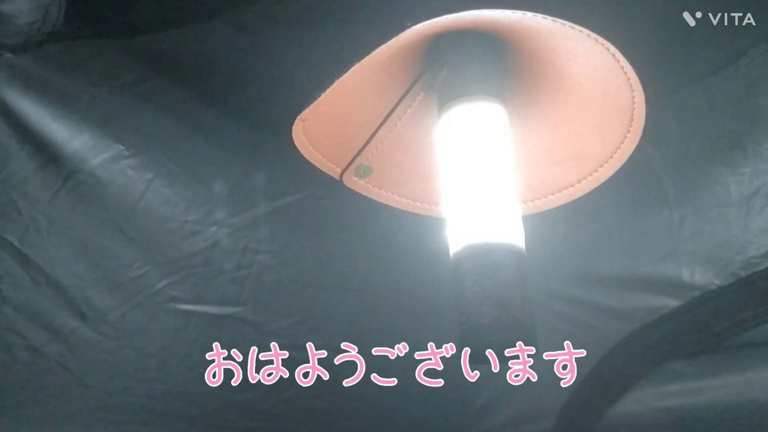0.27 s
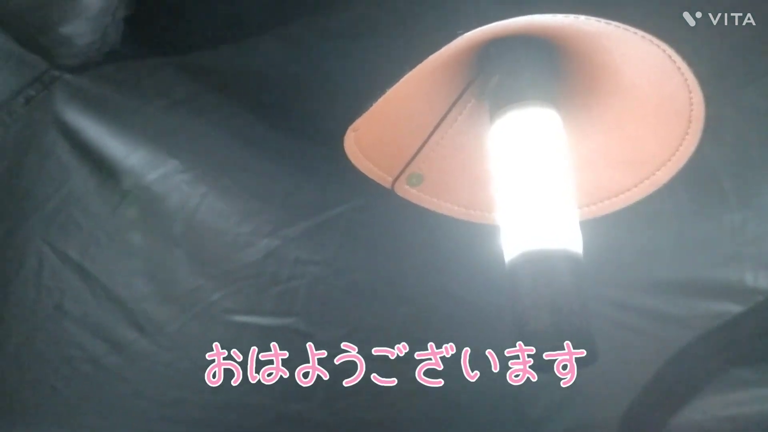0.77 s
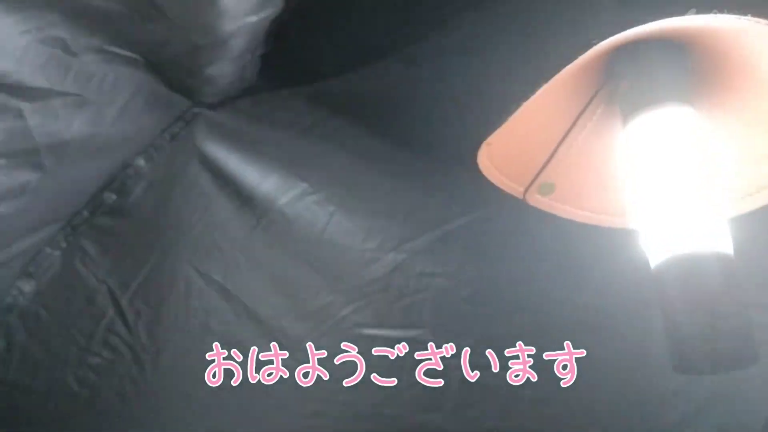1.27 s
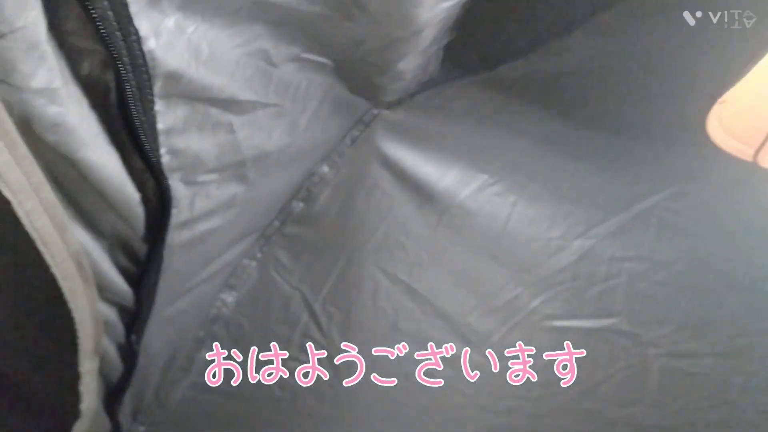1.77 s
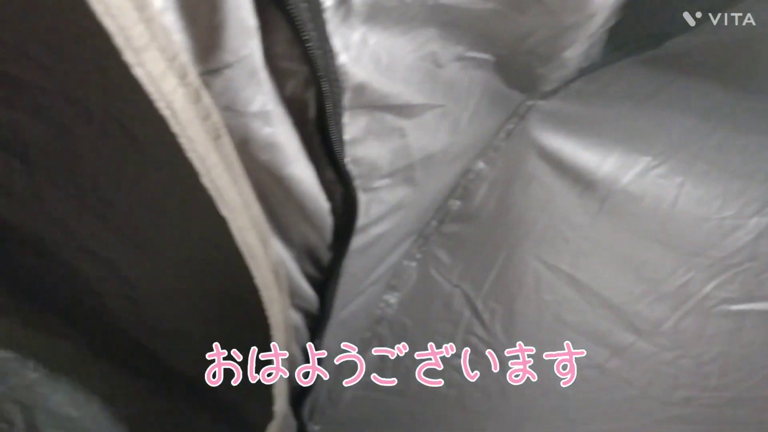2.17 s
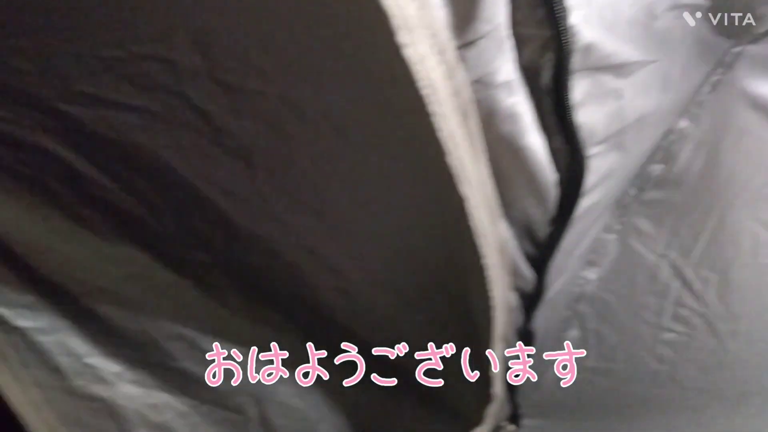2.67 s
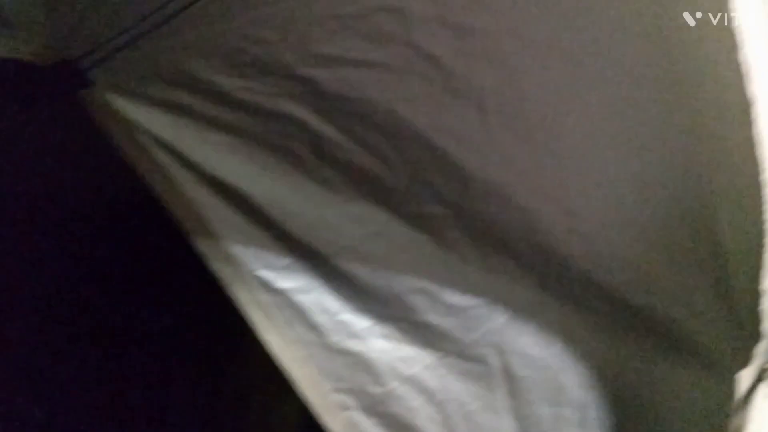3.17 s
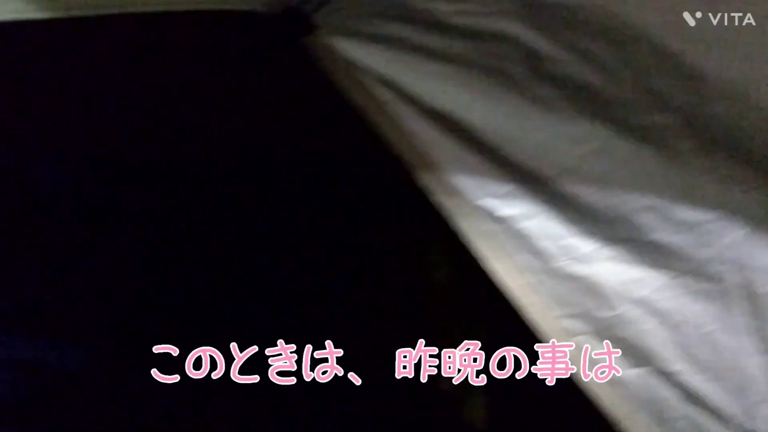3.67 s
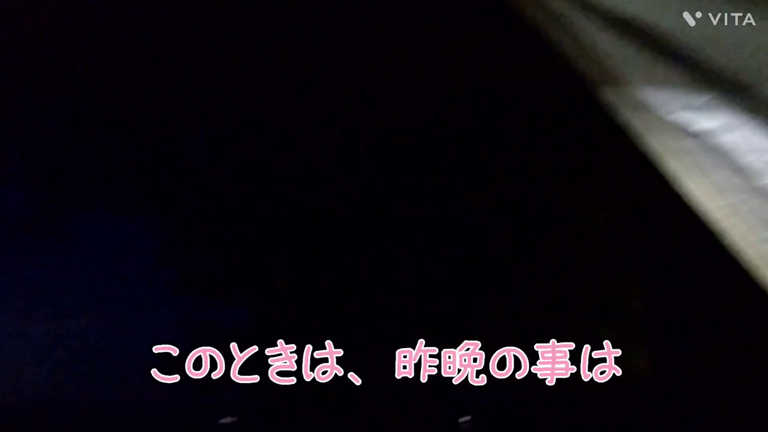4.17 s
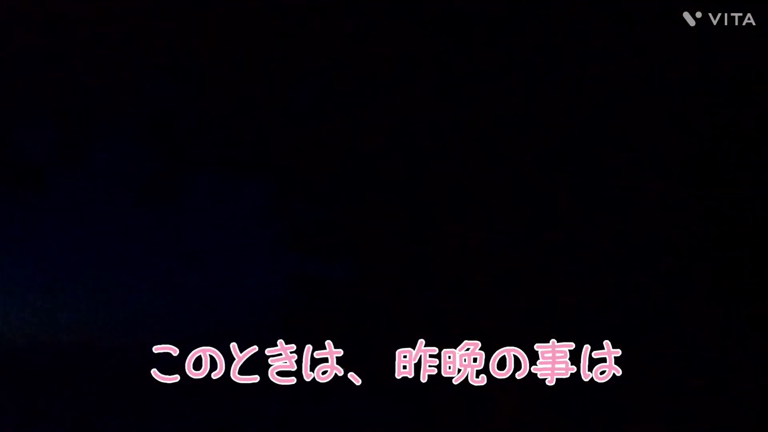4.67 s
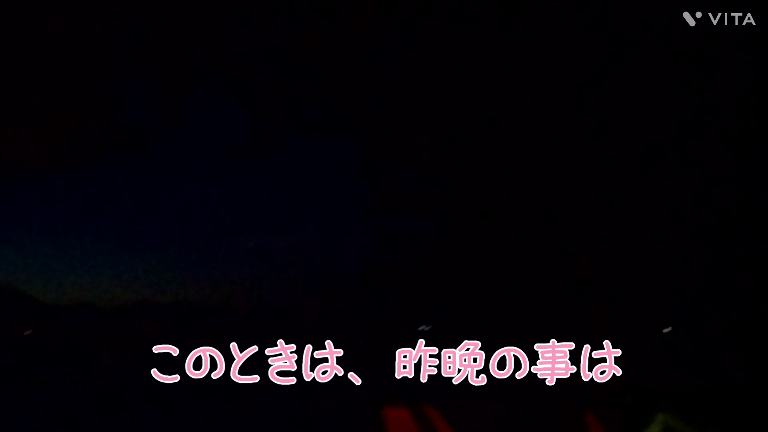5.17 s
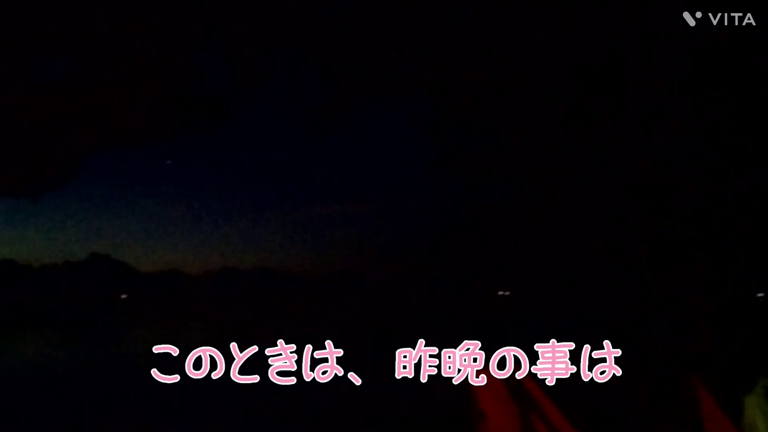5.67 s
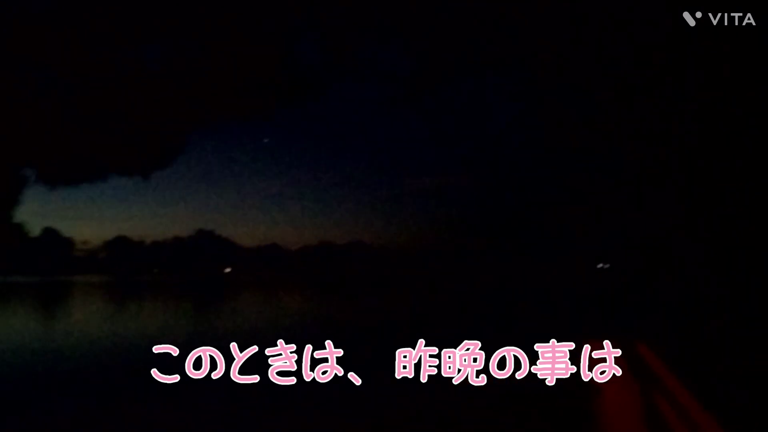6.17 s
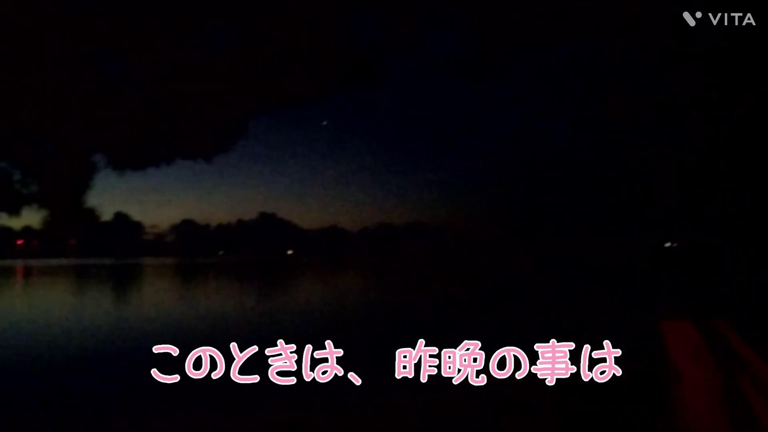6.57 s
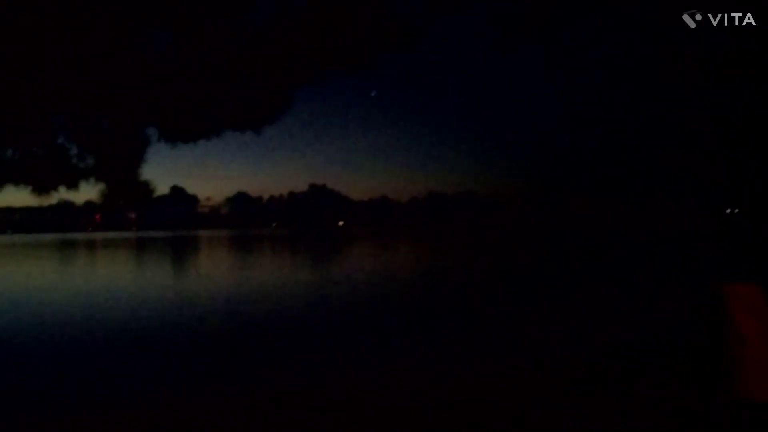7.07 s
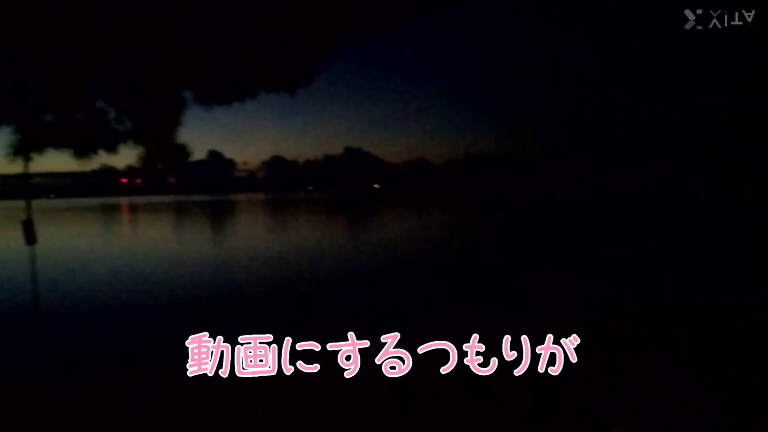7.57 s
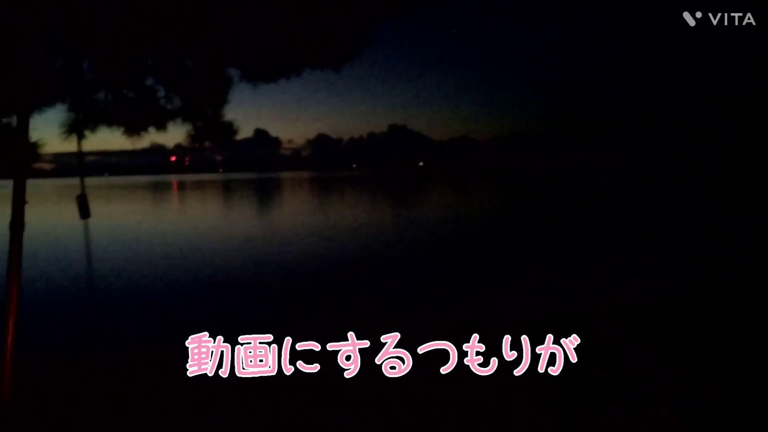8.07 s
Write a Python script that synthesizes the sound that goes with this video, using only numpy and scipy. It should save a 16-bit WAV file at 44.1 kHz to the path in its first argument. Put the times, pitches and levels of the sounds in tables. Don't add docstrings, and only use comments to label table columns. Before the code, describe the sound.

A quiet lakeside before dawn, heard through a phone microphone. From 0 to about 1 second near crickets trill strongly around 3.9 kHz, each pulse a tiny falling whistle, fourteen to twenty-one per second; hiss and low rumble are raised until 0.76 seconds, then drop. Small drips and a brief lap come at 0.3 to 0.65, a cloth snap at 0.6. From 1 to 5 seconds softer trill phrases overlap, with high buzzes, dry rasps and a blurred distant chorus. Faint ticks at 2.0, 3.4 and 3.7; dull low finger knocks at 3.8 and 4.6. Trilling strengthens around 5.5 to 6.5. Fine bubbles lap from 6 to 7.2, with snaps at 6.55 and, sharpest, 7.1. Near crickets then rest, leaving a faint higher trill; hiss lifts at 7.7, and soft near trills return at 8.

```python
import sys
import numpy as np
from scipy import signal
from scipy.fft import rfft, irfft, dct
from scipy.io import wavfile
from scipy.ndimage import uniform_filter1d

SR = 44100
rng = np.random.default_rng(int(sys.argv[2]) if len(sys.argv) > 2 else 0)


def rack_gain(trim_db):
    fader = np.asarray(trim_db, float)
    return 10 ** (fader / 20)


def pcm_store(signal):
    levels = np.round(np.clip(np.atleast_2d(signal), -1, 1) * 32767)
    wavfile.write(sys.argv[1], SR, levels.astype(np.int16).T)


N = 366912
FALL_HZ_PER_MS = 19.13


def evened(x):
    return x / np.sqrt(np.mean(x ** 2) + 1e-20)


def curve(rows):
    times, levels = np.transpose(rows)
    return np.interp(np.arange(N) / SR, times, levels)


def add(mix, s, sound):
    start = round(s * SR) - len(sound) // 2
    sound = sound[max(-start, 0):]
    part = mix[max(start, 0):][:len(sound)]
    part += sound[:len(part)]


def noise(spectrum, patchy_db, swell_db):
    frames, hz = N // 256 + 5, np.fft.rfftfreq(1024, 1 / SR)
    a, b, patches = rng.standard_normal((frames, 513, 3)).T
    patches = uniform_filter1d(patches, size=12, axis=0)
    patches = evened(uniform_filter1d(patches, size=10, axis=1))
    swell = evened(uniform_filter1d(rng.standard_normal(frames), size=6))
    f, db = np.transpose(spectrum)
    shape_db = np.interp(np.log(hz + 1), np.log(f + 1), db)
    level_db = shape_db[:, None] + patchy_db * patches + swell_db * swell
    z = (a + 1j * b) * rack_gain(level_db)
    return evened(signal.istft(z, nperseg=1024, noverlap=768)[1][:N])


def glide(db, hz, ms, fall_hz, phase, bend=0.68):
    u = np.linspace(-.5, .5, max(round(ms * SR / 1000), 8))
    pitch_hz = hz - fall_hz * (u + bend * u ** 2)
    turns = np.cumsum(pitch_hz) / SR + phase
    return rack_gain(db) * np.cos(np.pi * u) * np.cos(2 * np.pi * turns)


def echoes(x, t60):
    taps, step = np.zeros(SR // 2), 22
    at = np.arange(200, len(taps) - step, step)
    taps[at + rng.integers(0, step, len(at))] = rng.choice([-1., 1.], len(at))
    taps *= rack_gain(-60 * np.arange(len(taps)) / SR / t60)
    return signal.fftconvolve(x, taps / np.linalg.norm(taps))[:N]


def air():
    # (frequency [Hz], level [dB per Hz])
    wash_spectrum = [(150, -2.5), (300, -8.5), (700, -6.5), (1500, -11), (2500, -15), (4000, -20.5),
                     (8000, -79)]
    hiss_spectrum = [(500, -23), (2000, 2), (3300, -2.5), (4800, 3), (5600, -0.5), (7000, 2), (9000, -1.5),
                     (13000, 0.5), (16000, -4.5)]
    rumble_spectrum = [(4.7, -21), (8.0, 0), (22, -2), (43, 3.5), (65, -12.5), (92, -1.5), (382, -19),
                       (501, -22.5), (600, -27.5), (780, -42), (1320, -120)]
    # (time [s], level [dB])
    wave_swell = [
        (0, 0),
        (1.7, -.5),
        (2.3, 2),
        (3.2, 0.2),
        (4.3, 2.5),
        (5.5, .5),
        (7.2, 1),
        (8.4, 0.5),
    ]
    t = np.arange(N) / SR
    wave_db = curve(wave_swell)
    warm_db = 4.5 / (1 + np.exp((t - 0.76) / 0.065))
    brush_db = 4 * np.exp(-((t - 7.7) / 0.15) ** 2)
    hiss = rack_gain(-70.5 + 0.32 * wave_db + brush_db) * noise(hiss_spectrum, patchy_db=1.76, swell_db=0.36)
    rumble = rack_gain(-59.5 + 0.3 * wave_db) * noise(rumble_spectrum, patchy_db=.5, swell_db=0.64)
    wash = rack_gain(-70 + wave_db) * noise(wash_spectrum, patchy_db=1.5, swell_db=0.93)
    return rack_gain(warm_db) * (hiss + rumble + wash)


def chorus():
    # (time [s], level [dB])
    chorus_level = [
        (0, -66),
        (.9, -75),
        (2.6, -70.5),
        (5.3, -71.5),
        (6.9, -78),
        (8.4, -77),
    ]
    out = np.zeros(N)
    for pace, pitch, start, size in rng.random((9, 4)):
        gap_s = 1 / (13.5 + 9 * pace)
        stroke = glide(-6 * size, 3670 + 350 * pitch, 32, 632, start)
        train = np.zeros(N)
        at = np.arange(start * gap_s, N / SR - .01, gap_s)
        late_s = .004 * rng.random(len(at))
        train[((at + late_s) * SR).astype(int)] = rack_gain(2.8 * rng.standard_normal(len(at)))
        out += signal.oaconvolve(train, stroke)[:N]
    return rack_gain(curve(chorus_level)) * evened(out + rack_gain(-2.5) * echoes(out, t60=0.33))


def far_trill():
    out = np.zeros(N)
    for s in np.arange(6.94, 8.03, .0662):
        later = s > 7.63
        add(out, s, glide(-68 - 4 * later, 4150 - 150 * later, 34, 520, rng.random()))
    return .8 * out + .9 * echoes(out, t60=.08)


def fabric():
    # (time [s], peak [dB], ring [Hz])
    cloth_snaps = [
        (0.6095, -52, 7480),
        (1.9994, -61, 7700),
        (3.421, -54, 8700),
        (3.7035, -55, 7530),
        (6.5583, -54, 7240),
        (7.0996, -46.5, 8100),
    ]
    out, t = np.zeros(N), np.arange(400) / SR
    for (s, db, hz), spit in zip(cloth_snaps, rng.standard_normal((len(cloth_snaps), 400))):
        fade = rack_gain(db + 1.5 - 60 * t / .005)
        ring = np.sin(2 * np.pi * hz * t)
        add(out, s + t[200], fade * (.6 * spit + .7 * ring))
    return out


def knocks():
    # (time [s], peak [dB], ring [Hz])
    finger_knocks = [
        (3.8148, -42, 125),
        (4.6405, -43, 115),
    ]
    out, t = np.zeros(N), np.arange(1400) / SR
    for s, db, hz in finger_knocks:
        turns = hz * t + .25 * (1 - np.exp(-t / .002))
        add(out, s + t[700], -rack_gain(db - 60 * t / .045) * np.sin(2 * np.pi * turns))
    return out


def water():
    # (middle [s], peak [dB], pitch [Hz])
    clear_drips = [(.055, -64, 2497), (.335, -63, 1765), (.377, -64, 535), (.433, -63.5, 1119),
                   (.451, -61, 1610), (.499, -61, 1690), (.503, -60, 1205), (.537, -62.5, 526),
                   (.557, -65, 547), (1.545, -67.5, 910), (2.045, -66, 2110), (2.522, -64, 2330),
                   (3.369, -69, 850), (4.194, -68, 1630), (4.21, -65, 834), (4.831, -68, 1981),
                   (5.885, -61, 1790), (6.063, -65, 1640), (6.265, -66, 825), (6.266, -66, 2368),
                   (6.281, -69, 1162), (6.323, -65, 2300), (6.346, -71, 1310), (6.393, -68, 1722),
                   (6.558, -65, 2756), (6.648, -66, 2411), (6.696, -67, 2130), (6.964, -64, 1450),
                   (7.102, -63.5, 2411), (7.124, -68.5, 1254)]
    # (middle [s], peak [dB], pitch [Hz], length [ms], rise [Hz])
    long_bubbles = [
        (6.274, -70, 1034, 34, 594),
        (7.119, -66, 994, 36, 800),
    ]
    # (start [s], end [s])
    lapping = [
        (.3, .65),
        (6.0, 7.2),
    ]
    out = np.zeros(N)
    for (s, db, hz), phase in zip(clear_drips, rng.random(len(clear_drips))):
        add(out, s, glide(db + 4.5, hz, 11500 / hz, -.25 * hz, phase))
    for at, size, pitch in rng.random((20, 3)):
        hz = 800 * 3.5 ** pitch
        add(out, at * N / SR, glide(-70.5 + 4 * size, hz, 11500 / hz, -.25 * hz, at))
    for s, db, hz, ms, rise_hz in long_bubbles:
        add(out, s, glide(db, hz, ms, -rise_hz, 0))
    for start, end in lapping:
        for at, size, pitch in rng.random((30, 3)):
            hz = 500 * 5.5 ** pitch
            db = -70 + 7 * size - 5 * pitch
            add(out, start + at * (end - start), glide(db, hz, 7000 / hz, -.3 * hz, at))
    return out + rack_gain(-14) * echoes(out, t60=.12)


def ticker():
    # (time [s], peak [dB], pitch [Hz])
    clear_buzzes = [(0.0857, -71, 6520), (0.2473, -72, 6530), (0.4628, -68, 6500), (1.9924, -68, 6490),
                    (2.378, -73, 6470), (2.7641, -71, 6420), (4.345, -73, 6450), (3.5493, -67, 6480),
                    (3.9549, -70, 6970), (4.2058, -72, 6440), (4.6129, -74, 6440), (4.7341, -72, 6470),
                    (5.1417, -71, 6470), (5.4954, -67.5, 6930), (6.0711, -77.5, 6610), (6.5395, -73, 6750)]
    out = np.zeros(N)
    faint = [(s * N / SR, -77 + 5 * size, 6300 + 700 * pitch ** 2)
             for s, size, pitch in rng.random((45, 3))]
    for s, db, hz in list(clear_buzzes) + faint:
        buzz = glide(db + 3.5, hz, 22, 130, 0)
        flutter = 0.7 + 0.28 * np.cos(2 * np.pi * 210 * np.arange(len(buzz)) / SR)
        add(out, s + 0.013, buzz * flutter)
    return out


def rasps():
    # (time [s], peak [dB])
    raspy_strokes = [(0.0727, -61), (0.2129, -65), (0.2887, -59), (0.61, -71), (1.9979, -59),
                     (2.2159, -60.5), (2.3486, -63), (2.4299, -64), (2.5062, -63), (3.4755, -60),
                     (3.704, -61), (5.1352, -64), (5.6012, -64), (6.0112, -73), (6.557, -61), (6.6448, -65),
                     (6.7131, -68), (7.099, -64)]
    teeth, t = np.zeros(N), np.arange(200) / SR
    for (s, db), grit in zip(raspy_strokes, rng.standard_normal((len(raspy_strokes), 900))):
        add(teeth, s + 0.0074, rack_gain(db - 11.5) * grit * np.hanning(len(grit)))
    for at, size in rng.random((200, 2)):
        grit = rng.standard_normal(1300) * np.hanning(1300)
        add(teeth, 1.85 + 6.1 * at, rack_gain(-80.5 + 3.2 * size) * grit)
    ring = t * rack_gain(-60 * t / .003) * np.sin(2 * np.pi * 7650 * t)
    return signal.oaconvolve(teeth, ring / np.linalg.norm(ring))[:N]


def strokes(phrases, gap_s, first_db, lag_s):
    uneven_db, uneven_hz = .8, 20
    rows = []
    for first, last, open_db, close_db, hz in phrases:
        u = np.linspace(0, 1, round((last - first) / gap_s) + 1)
        a, b = rng.standard_normal((len(u), 2)).T
        level_db = open_db + (close_db - open_db) * u + first_db * (u == 0) + uneven_db * a
        at = first + (last - first) * u + lag_s * np.sin(np.pi * u)
        at = at - uneven_hz * b / FALL_HZ_PER_MS / 1000
        rows += zip(at, level_db, hz + uneven_hz * b)
    return rows


def wing(x):
    hz = np.fft.rfftfreq(N, 1 / SR)
    lift_db = 2 * (np.exp(-((hz - 4034) / 122) ** 2) - .5)
    return irfft(rfft(x) * rack_gain(lift_db), N)


def crickets():
    # (first stroke [s], last stroke [s], opening level [dB], closing level [dB], pitch [Hz])
    slow_phrases = [(-.073, .361, -46, -46.5, 3930), (1.083, 1.494, -57, -57.5, 4110),
                    (1.648, 2.571, -61, -55, 3780), (1.719, 2.151, -55, -53, 3970),
                    (2.678, 2.885, -58, -64, 3770), (3.052, 3.256, -64.5, -64, 3780),
                    (3.353, 3.78, -65, -59, 3700), (3.776, 3.997, -57, -57, 3734),
                    (3.85, 4.223, -53.5, -55, 3960), (4.845, 5.052, -62, -71, 3760),
                    (5.173, 5.741, -66, -62.5, 3900), (5.562, 6.08, -55.5, -51, 3906),
                    (6.673, 6.888, -60, -72, 3860), (8.02, 8.31, -58, -57.5, 4030),
                    (8.034, 8.257, -65, -62, 3860), (1.5, 1.571, -66, -62, 4080),
                    (5.176, 5.247, -62, -62, 3860)]
    quick_phrases = [(.041, .091, -57, -57, 3800), (.262, .307, -53, -54, 3800),
                     (.436, .809, -48, -49.5, 3917), (.892, .978, -50.5, -57, 3930),
                     (1.024, 1.112, -53, -53, 3950), (1.197, 1.241, -55.5, -56, 3940),
                     (.69, .833, -66, -66, 4020), (1.333, 1.514, -58.5, -63, 3840),
                     (1.605, 1.749, -61, -63, 3890), (2.236, 2.424, -57.5, -56, 3900),
                     (2.473, 2.743, -58, -61, 3950), (2.79, 2.89, -65, -60, 3952),
                     (2.922, 3.007, -61, -63, 3710), (3.116, 3.459, -60.5, -63, 3840),
                     (3.563, 3.611, -56, -56, 3820), (3.729, 3.775, -56, -61, 3850),
                     (4.106, 4.19, -56, -62, 3830), (4.279, 4.453, -62, -60.5, 3800),
                     (4.57, 4.787, -57, -60, 3790), (4.875, 5.144, -62, -64, 3790),
                     (5.856, 5.993, -64, -65, 3870), (5.443, 5.59, -56.5, -60, 3810),
                     (6.162, 6.545, -54, -56.5, 3880), (6.635, 6.882, -56.5, -62.5, 3854)]
    quick = strokes(quick_phrases, gap_s=.047, first_db=-1, lag_s=.0005)
    slow = strokes(slow_phrases, gap_s=.071, first_db=-6, lag_s=.002)
    out = np.zeros(N)
    for rows, ms in ((quick, 29), (slow, 38)):
        fall_hz = FALL_HZ_PER_MS * ms
        for (s, db, hz), (phase, late) in zip(rows, rng.random((len(rows), 2))):
            add(out, s, glide(db, hz, ms, fall_hz, phase))
            add(out, s + .013, glide(db - 13, hz, ms, fall_hz, late))
            add(out, s + .55 * ms / 1000, glide(db - 14, hz - 11 * ms, 14, 330, late))
            add(out, s, glide(db - 28, 2 * hz, ms, 2 * fall_hz, phase))
    flutter_db = .7 * evened(uniform_filter1d(rng.standard_normal(N), size=130))
    out = wing(out) * rack_gain(flutter_db)
    return out + rack_gain(-17) * echoes(out, t60=.07) + rack_gain(-16) * echoes(out, t60=.3)


def scene():
    insects = crickets() + far_trill() + chorus() + ticker() + rasps()
    return (insects + water() + fabric() + knocks() + air())[None]


def bias():
    t = np.arange(N) / SR
    quick_tau_s, slow_tau_s = .2, 1.1
    quick = -.043 * (1 + t / quick_tau_s) * np.exp(-t / quick_tau_s)
    return quick - .012 * np.exp(-t / slow_tau_s)


def treble_dropouts(x):
    hz, t, z = signal.stft(x, SR, nperseg=1024, noverlap=768, padded=True)
    band = (20 * np.log(1 + hz / 1500)).astype(int)
    luck = rng.random((band.max() + 1, len(t) // 4 + 1))
    luck = luck[band][:, np.arange(len(t)) // 4]
    weak = uniform_filter1d(abs(z[0]) ** 2, size=9, axis=0) < rack_gain(-190)
    hz = hz[:, None]
    beside_trill = abs(abs(hz - 3800) - 650) < 130
    dropped = (luck < .06 + .14 * beside_trill) & weak & (hz > 2800)
    return x - signal.istft(.92 * z * dropped, SR, nperseg=1024, noverlap=768)[1][:, :N]


def top_cut(x):
    return signal.sosfilt(signal.butter(12, 15530, fs=SR, output="sos"), x)


def record(dry):
    spectrum = dct(treble_dropouts(dry + bias()), norm="ortho")
    spectrum[:, round(2 * N * 14270 / SR):] *= rack_gain(-30)
    return top_cut(dct(spectrum, type=3, norm="ortho"))


dry = scene()
out = record(dry)
pcm_store(out)
```